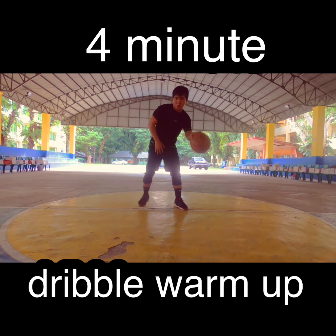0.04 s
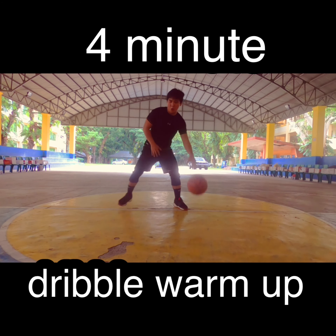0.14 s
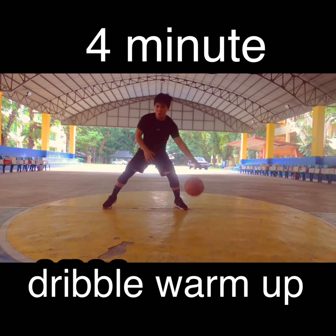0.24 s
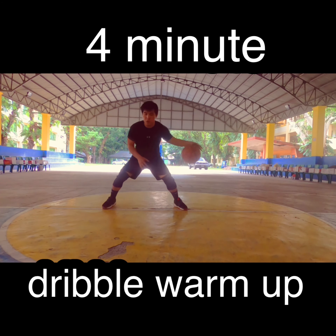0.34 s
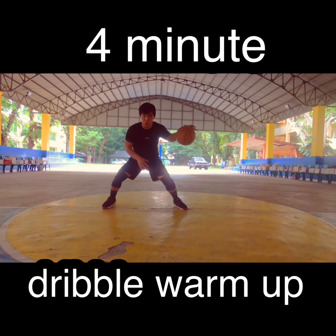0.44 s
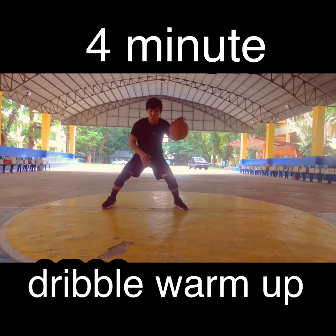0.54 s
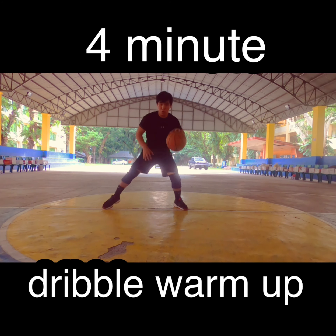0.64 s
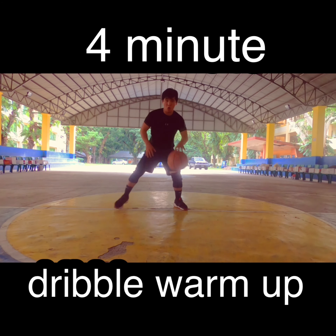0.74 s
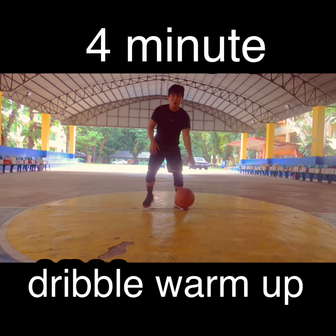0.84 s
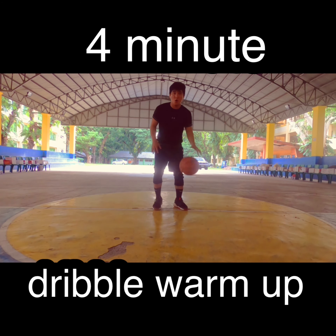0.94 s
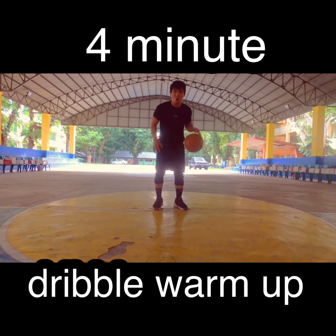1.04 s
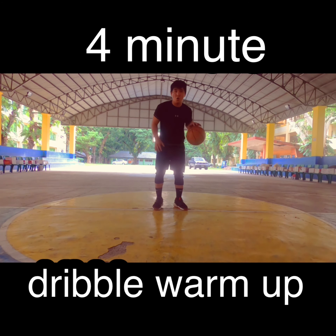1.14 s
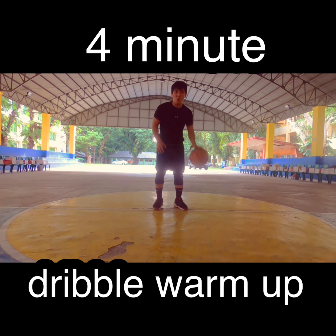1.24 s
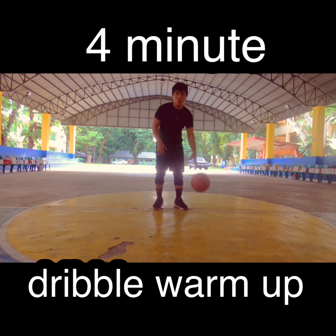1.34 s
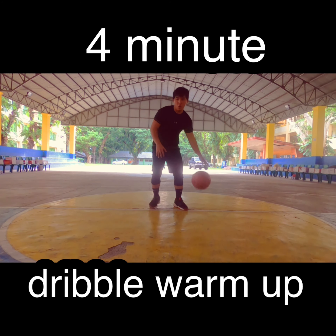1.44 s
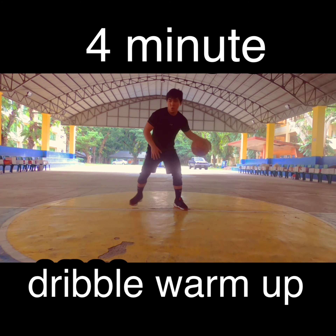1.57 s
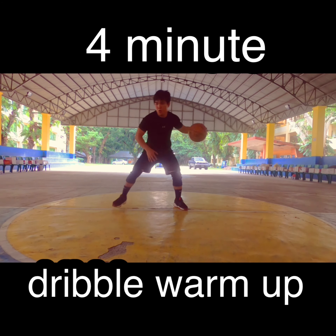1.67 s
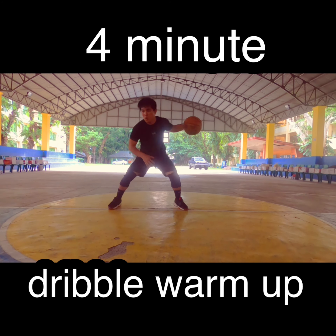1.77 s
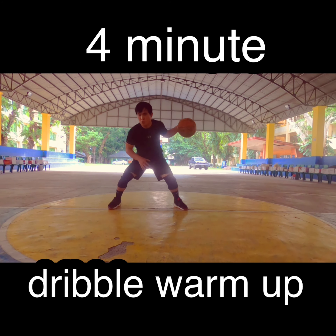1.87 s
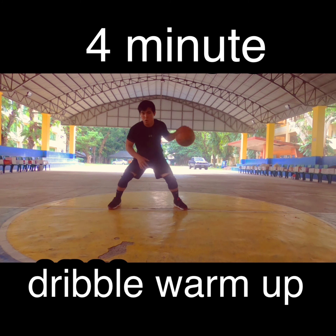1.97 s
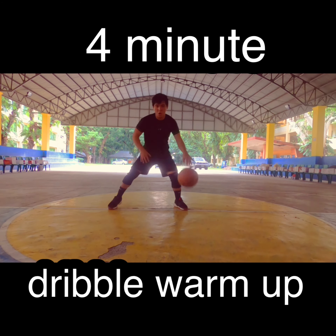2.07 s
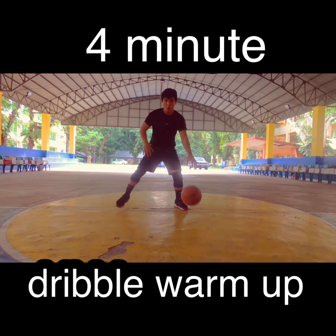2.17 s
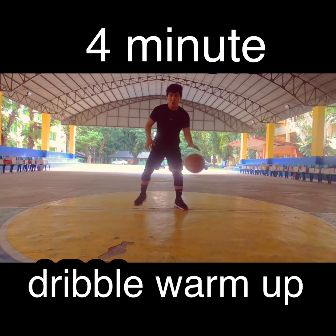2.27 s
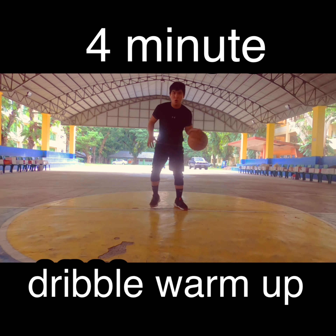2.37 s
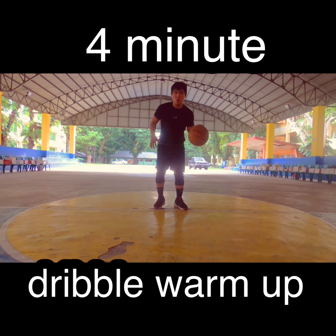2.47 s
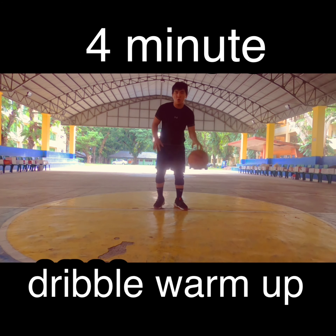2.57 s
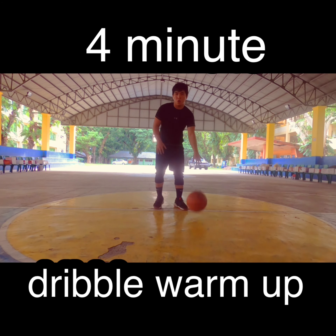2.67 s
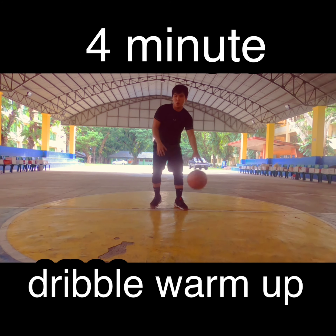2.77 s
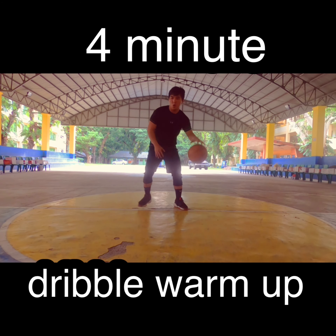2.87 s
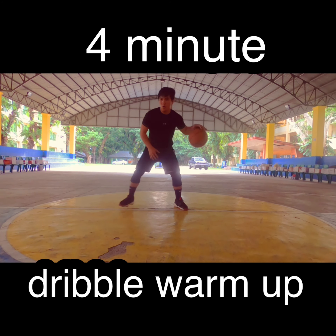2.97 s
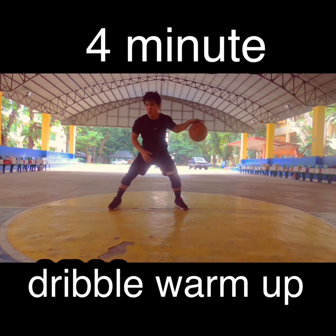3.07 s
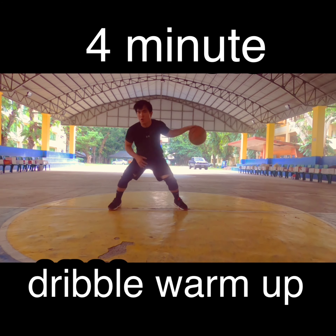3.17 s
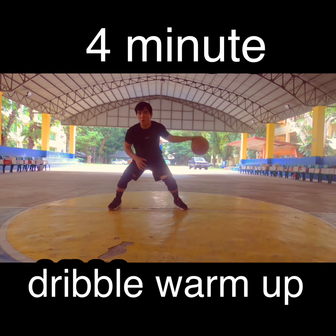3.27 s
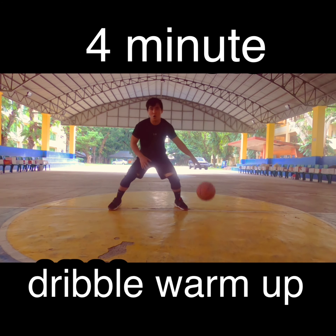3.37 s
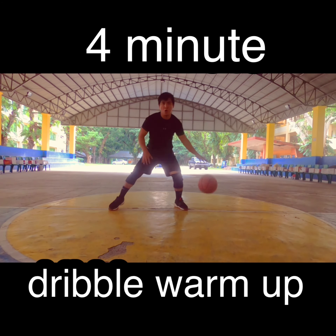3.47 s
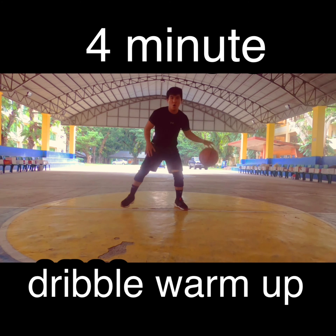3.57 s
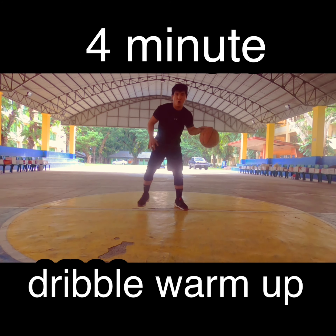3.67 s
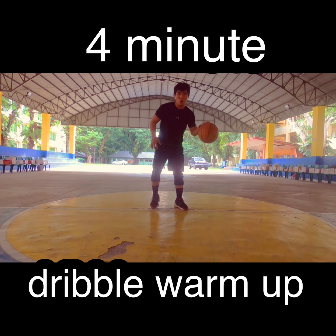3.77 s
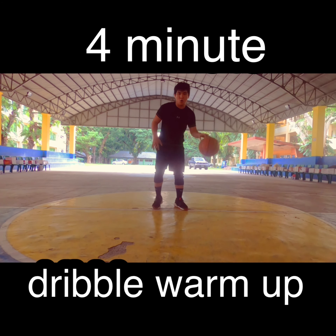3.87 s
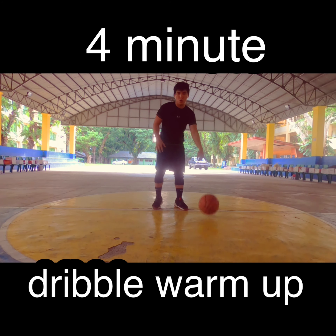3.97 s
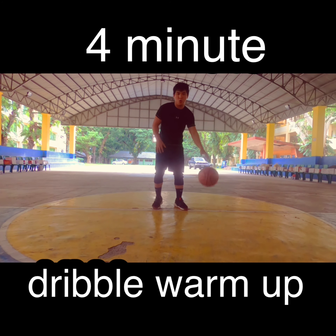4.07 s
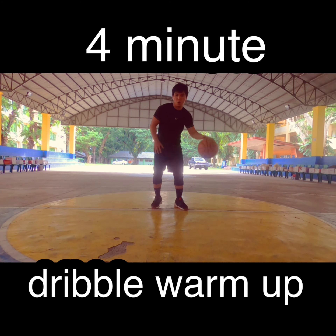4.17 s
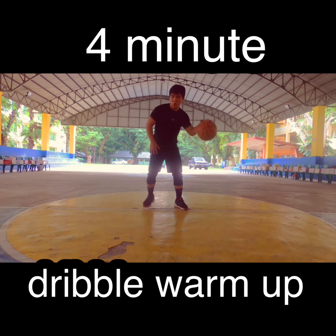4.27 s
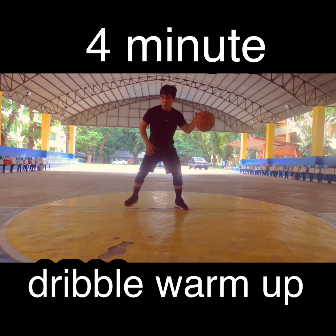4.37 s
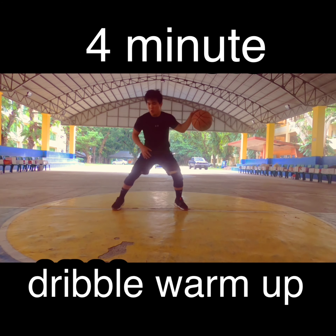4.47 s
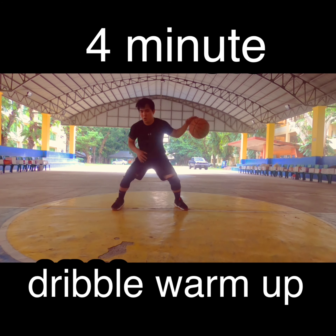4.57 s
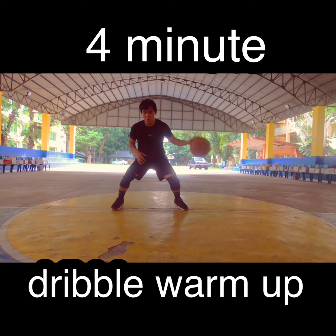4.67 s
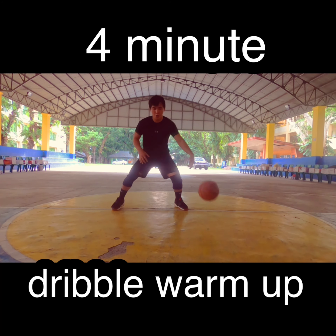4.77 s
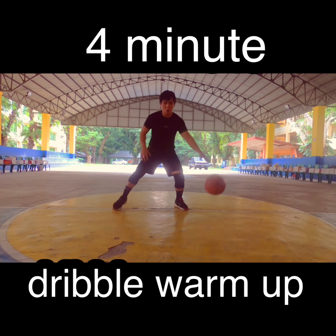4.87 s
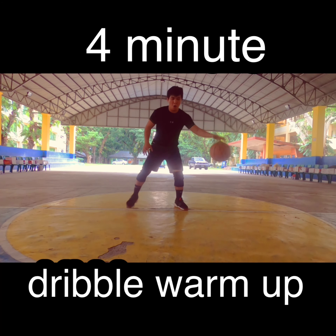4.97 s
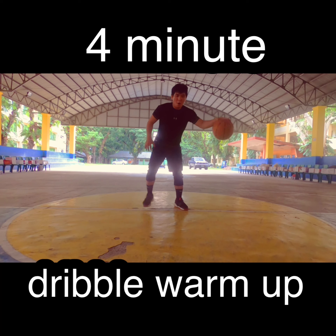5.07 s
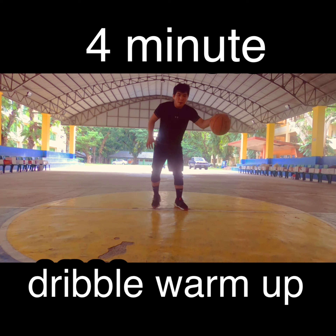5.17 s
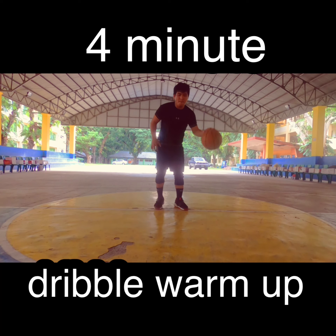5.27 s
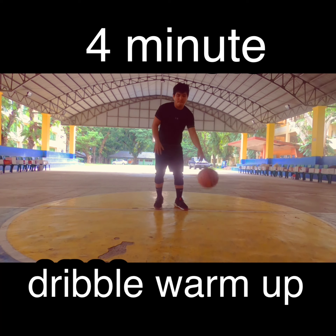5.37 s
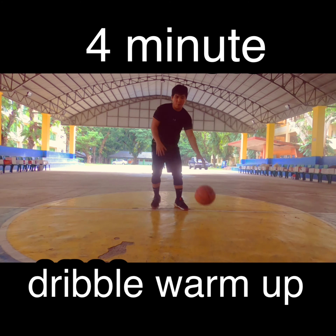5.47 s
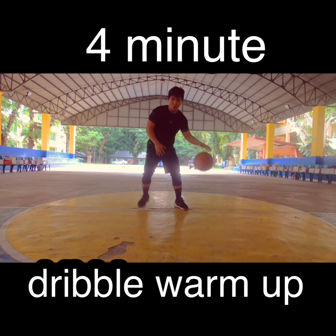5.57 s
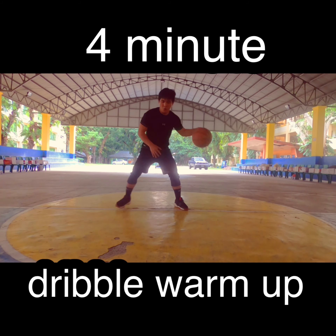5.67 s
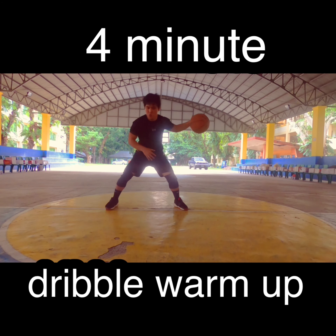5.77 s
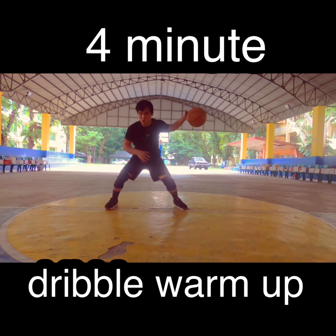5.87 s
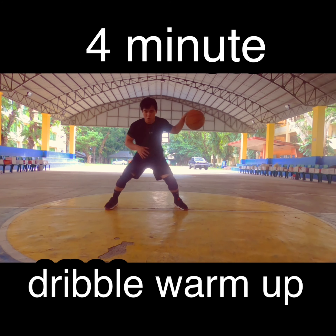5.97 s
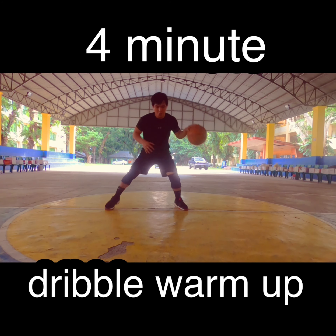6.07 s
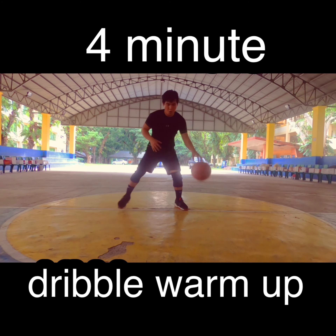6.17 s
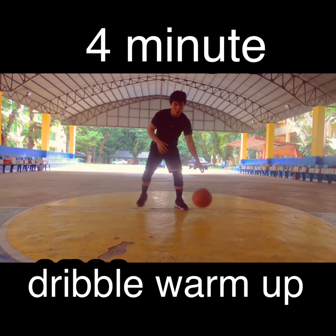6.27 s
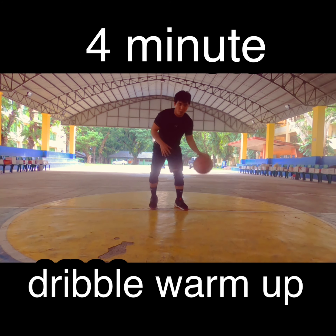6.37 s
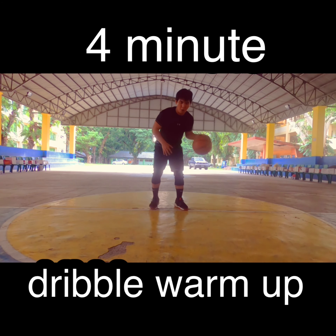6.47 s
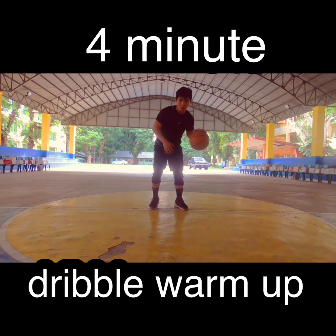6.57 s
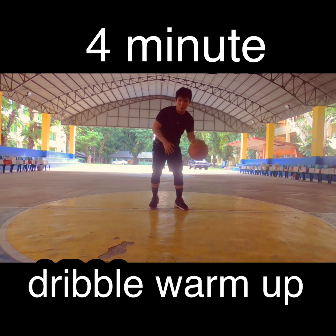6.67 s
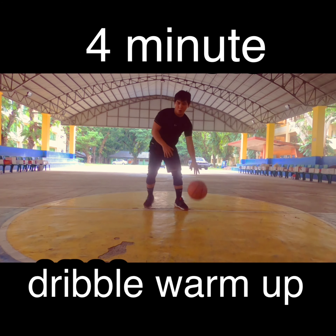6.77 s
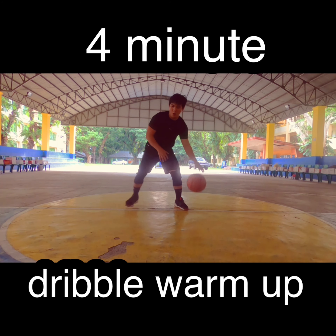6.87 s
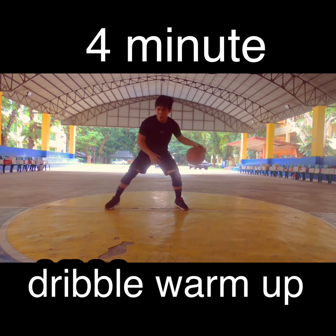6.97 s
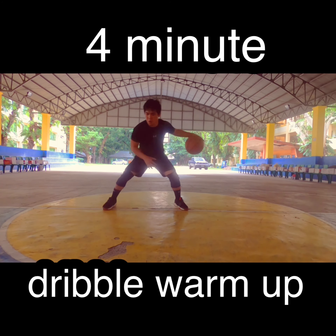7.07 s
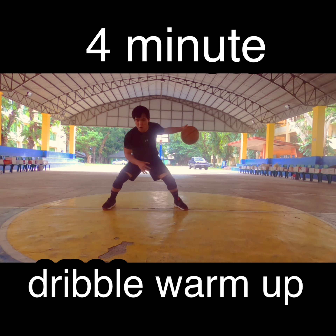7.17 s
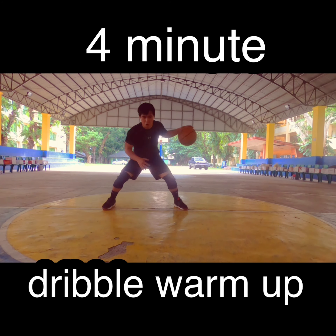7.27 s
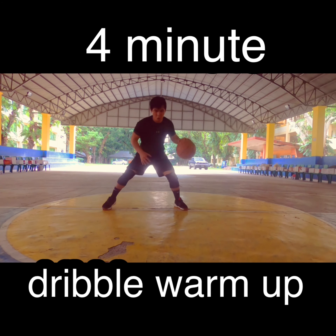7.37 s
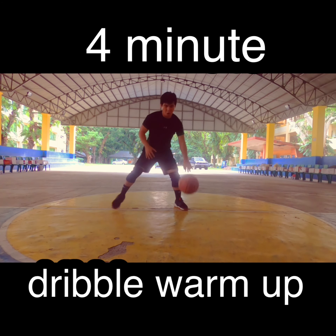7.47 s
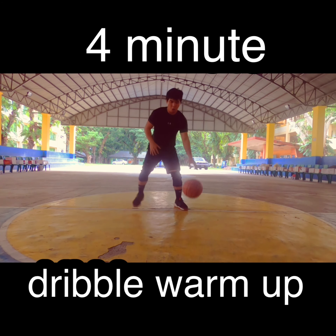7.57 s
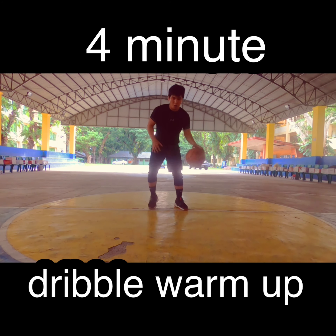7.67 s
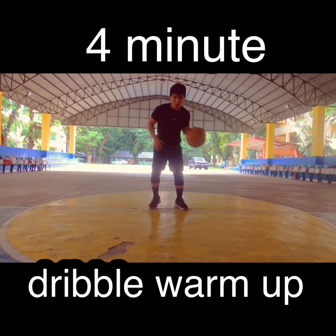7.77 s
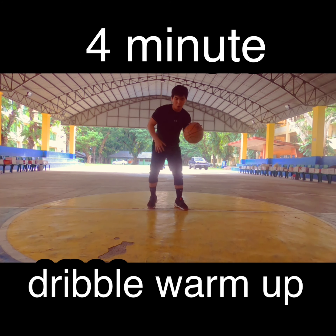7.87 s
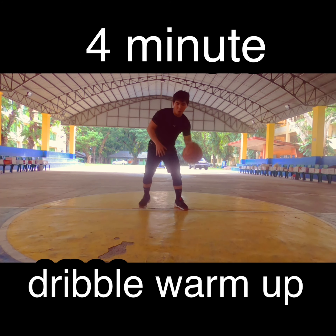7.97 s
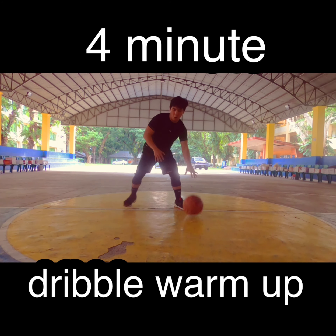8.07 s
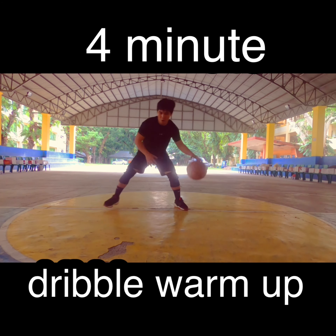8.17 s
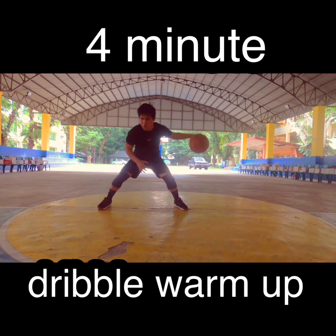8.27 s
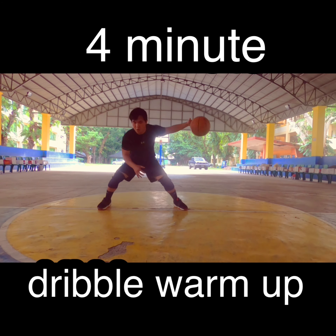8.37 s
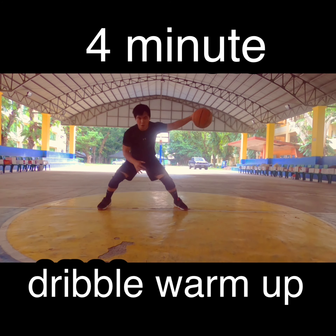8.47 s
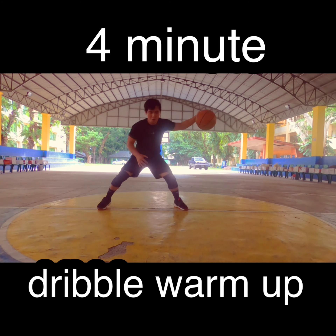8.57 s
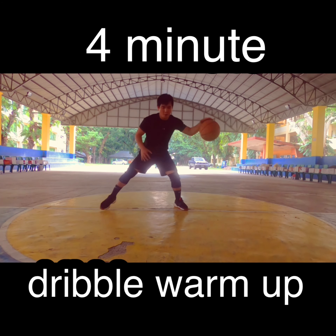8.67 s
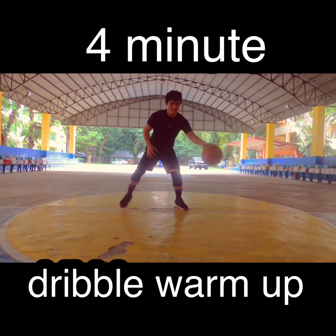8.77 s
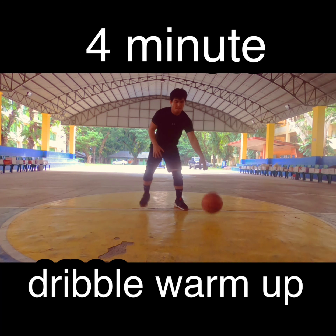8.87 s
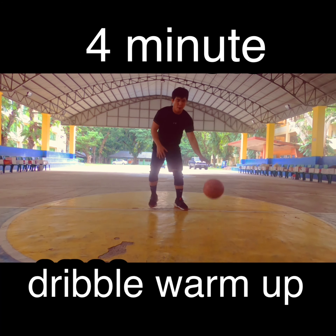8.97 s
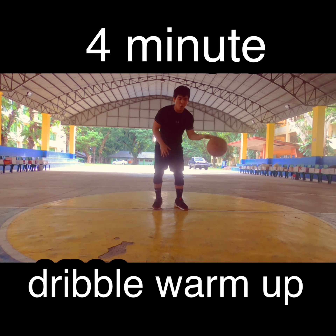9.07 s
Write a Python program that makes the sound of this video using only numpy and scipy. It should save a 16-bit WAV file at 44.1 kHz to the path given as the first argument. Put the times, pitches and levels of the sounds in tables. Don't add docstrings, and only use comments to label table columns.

```python
import sys
import numpy as np
from scipy import signal
from scipy.fft import rfft, irfft
from scipy.io import wavfile
from scipy.ndimage import uniform_filter1d, minimum_filter1d

SR = 44100
rng = np.random.default_rng(int(sys.argv[2]) if len(sys.argv) > 2 else 0)


def unload_audio(sound):
    columns = np.transpose(np.atleast_2d(sound))
    steps = np.round(np.clip(columns, -1, 1) * 32767)
    wavfile.write(sys.argv[1], SR, steps.astype(np.int16))


def magnitude_from_level(level_db):
    exponent = np.asarray(level_db, float) / 20
    return 10 ** exponent


N = 402633

# (time [s], click level [dB], ring level [dB], tail level [dB], roof echo level [dB])
BOUNCE_EVENTS = [(0.3323, -7, -22, -28, -1.5), (0.9613, -6, -22.5, -26, 0.5), (1.5095, -7, -24, -27, -7),
                 (2.2876, -7.5, -23.5, -25.5, -0.5), (2.837, -8, -22, -28, -3), (3.557, -6, -23.5, -25, -2),
                 (4.133, -8.5, -24.5, -24.5, -2.5), (4.9615, -5, -21.5, -25, -1.5),
                 (5.5903, -6, -22.5, -25.5, -4.5), (6.403, -10, -18, -31, -3),
                 (6.9287, -7.5, -23, -25.5, 0.5), (7.6424, -9.5, -19, -24.5, 4.5),
                 (8.1995, -8.5, -19, -29.5, -2.5), (9.008, -6.5, -22, -26.5, -4)]
# (frequency [Hz], level [dB per Hz])
CLICK_SPECTRUM = [(400, -44), (800, 4.5), (1100, 1), (2100, -2), (3100, -3), (4300, -7), (5200, -12.5),
                  (6300, -17.5), (7500, -26), (9300, -19.5), (11000, -31.5), (12500, -38), (15000, -45),
                  (16500, -70)]
ROUND_TRIP_S = .0479


def evened(x):
    return x / np.sqrt(np.mean(x ** 2) + 1e-20)


def read(points, hz):
    f, value = np.transpose(points)
    return np.interp(np.log(hz + 1), np.log(f + 1), value)


def add(mix, s, sound):
    at = round(s * SR)
    part = mix[max(at, 0):][:max(len(sound) + min(at, 0), 0)]
    part += sound[max(-at, 0):][:len(part)]


def noise(seconds, db_of, patchy_db):
    hz = np.fft.rfftfreq(1024, 1 / SR)[:, None]
    t = np.arange(int(seconds * SR) // 256 + 2) * 256 / SR
    a, b, patches = rng.standard_normal((len(t), 513, 3)).T
    patches = uniform_filter1d(uniform_filter1d(patches, size=8, axis=0), size=5, axis=1)
    patches_db = patchy_db * evened(patches) * np.minimum(hz / 700, 1)
    bins = (a + 1j * b) * magnitude_from_level(db_of(hz, t) + patches_db)
    return signal.istft(bins, nperseg=1024, noverlap=768)[1]


def narrow(hz, width_hz):
    a, b = rng.standard_normal((len(hz), 2)).T
    r = np.exp(-np.pi * width_hz / SR)
    slow = signal.lfilter([1], np.convolve([1, -r], [1, -r]), a + 1j * b)
    carrier = np.exp(2j * np.pi * np.cumsum(hz) / SR)
    return evened((slow * carrier).real)


def thump():
    # (first delay [s], spacing [s], gain [ratio], factor to the next [ratio])
    bass_echoes = [(.0251, 0.0048, .21, .45), (.045, .0077, -.28, .3), (.0578, .0096, .33, .78),
                   (.0929, .0115, -.44, .78), (.1639, .0166, .16, 0.62), (.1805, .0077, .14, .6),
                   (.222, 0.01272, -0.1, -1.07), (.265, 0.01155, -0.085, -0.67)]
    contact_s, skin_hz, skin_width_hz = .0106, 203, 160
    t = np.arange(1500) / SR
    squash = np.sin(np.pi * np.clip((t - .001) / contact_s, 0, 1)) ** 1.803
    r = np.exp(-np.pi * skin_width_hz / SR)
    skin = [1, -2 * r * np.cos(2 * np.pi * skin_hz / SR), r * r]
    push = signal.lfilter([-1, 2, -1], skin, squash)
    echoes = np.zeros(SR // 3)
    echoes[0] = 1
    k = np.arange(4)
    for s, step_s, gain, factor in bass_echoes:
        echoes[np.round((s + step_s * k) * SR).astype(int)] += gain * factor ** k
    return np.convolve(push / abs(push).max(), echoes)


def slap(tilt_db):
    # (delay [ms], level [dB])
    rattle = [
        (-.96, -9),
        (0, 0),
        (.96, -7),
        (1.95, -12),
        (2.9, -19),
    ]
    hz = np.fft.rfftfreq(1024, 1 / SR)
    train = np.zeros(len(hz), complex)
    for ms, db in rattle:
        level = magnitude_from_level(db + 2.5 * rng.standard_normal())
        delay_s = (ms * rng.uniform(0.93, 1.05) + 2) / 1000
        train += level * np.exp(-2j * np.pi * hz * delay_s)
    grit = .035 * rng.standard_normal(1024) * np.exp(-abs(np.arange(1024) - 100) / 70.)
    train += rfft(grit)
    train *= hz ** 8 / (hz ** 8 + 830. ** 8)
    colour = magnitude_from_level(read(CLICK_SPECTRUM, hz) + tilt_db * np.log2(hz / 2000 + 0.081))
    click = irfft(-1j * colour * train)
    return click / abs(click).max()


def ring(pitch=1):
    # (frequency [Hz], level [dB], t60 [s])
    ball_modes = [(405, -8, .09), (960, -3, .024), (1080, 0, .024), (1200, -4, .024), (2090, -10, .022),
                  (3100, -14, .02)]
    t, out = np.arange(4000) / SR, np.zeros(5000)
    for s, db, rise_s in ((0, 0, .0008), (.0095, -1.0, .002)):
        modes = np.zeros(len(t))
        for hz, mode_db, t60_s in ball_modes:
            mode_hz = hz * rng.uniform(.97, 1.03) * pitch
            level_db = mode_db + 1.3 * rng.standard_normal() - 60 * t / t60_s
            modes += magnitude_from_level(level_db) * np.sin(2 * np.pi * mode_hz * t)
        add(out, s, magnitude_from_level(db) * modes * np.minimum(t / rise_s, 1))
    return out


def bright_bounce(click_db, ring_db, over_usual_db):
    bright = magnitude_from_level(click_db - 1.5) * np.pad(slap(0.7 * (click_db + 10)), (0, 4000))
    pitch = 1 + 0.05 * (over_usual_db + 0.5)
    add(bright, .002, magnitude_from_level(ring_db + 3.0) * ring(pitch))
    return bright


def smear():
    t = np.arange(2000) / SR
    hz, turn, size = rng.random((24, 3)).T[:, :, None]
    hz = 900 + 11000 * hz
    level = magnitude_from_level(0.55 * read(CLICK_SPECTRUM, hz) + 15 * size)
    tones = (level * np.sin(2 * np.pi * (hz * t + turn))).sum(0)
    return evened(tones) * np.interp(t, [0, .024, .04], [0, 1, 0]) ** 1.92


def add_roof_echoes(out, s, bright, roof_db):
    first_s, first_db, loss_db_per_trip = .0412, -6.5, 3.6
    for trip in range(5):
        delay_s = first_s + trip * ROUND_TRIP_S
        db = first_db + roof_db - trip * loss_db_per_trip
        blur = rng.standard_normal(200) * np.exp(-np.arange(200) / 35.)
        blur[0] = 12.0
        blurred = np.convolve(bright, blur / np.linalg.norm(blur))
        echo = signal.lfilter([.27], [1, -.73], blurred)
        add(out, s + delay_s - .002, magnitude_from_level(db) * echo)


def ribs():
    rib_hz, nearest_s = 2450, 0.041
    flight_s = nearest_s + np.arange(150, 1500) / SR
    hz = rib_hz * flight_s / np.sqrt(flight_s ** 2 - nearest_s ** 2)
    return narrow(hz * rng.uniform(0.89, 1.04), 310) * signal.windows.tukey(len(hz), .7)


def hall(colour_db, start_s, rise_s, early):
    # (frequency [Hz], t60 [s])
    decay_t60 = [(60, 2.5), (150, 1.04), (400, 1.72), (1000, 1.96), (3000, 1.9), (6000, 1.3), (10000, 1.07),
                 (15000, 0.63)]
    tail = noise(1.6, lambda hz, t: colour_db(hz) - 60 * (t - .2) / read(decay_t60, hz), patchy_db=2.5)
    t = np.arange(len(tail)) / SR
    throb = 1 + 0.5 * np.exp(-t / 0.14) * np.cos(2 * np.pi * (t - .05) / ROUND_TRIP_S)
    rise = np.clip((t - start_s) / rise_s, early, 1)
    return tail * throb * rise * np.clip((1.6 - t) / .4, 0, 1)


def treble_hall(ring_db, over_usual_db):
    # (frequency [Hz], level [dB per Hz])
    air_spectrum = [(500, -3), (700, -13), (950, -0.5), (1300, -7), (1650, -10.5), (2900, -12),
                    (4200, -13.5), (5000, -20), (6500, -24), (7600, -29.5), (9300, -27), (11000, -38.5),
                    (14500, -51), (15500, -77)]
    bright_db_per_octave = 0.41 * over_usual_db

    def colour_db(hz):
        lift_db = 1.71 * (ring_db + 24.0) * np.exp(-np.log(hz / 1150 + 1e-9) ** 2 / 0.23)
        tilt_db = bright_db_per_octave * np.log2(hz / 3000 + .01)
        return read(air_spectrum, hz) - 40 * (hz < 480) + lift_db + tilt_db
    return hall(colour_db, 0.032, 0.0072, 0.64)


def dribble():
    earlier = (-0.24, -9, -24, -27, -3)
    # (frequency [Hz], level [dB per Hz])
    hall_spectrum = [(18, -44), (30, -5), (75, -9.5), (114, 3.5), (189, -15.5), (239, 1), (286, -19),
                     (397, -5), (462, -30), (567, -19), (651, -35), (800, -22.5), (1040, -72), (1760, -120)]
    thump_db, usual_ring_db = -9.5, -22.5

    def boom_db(hz):
        return read(hall_spectrum, hz) - 10 * np.log10(1 + (hz / 200) ** 6)

    def body_db(hz):
        return read(hall_spectrum, hz) - 10 * np.log10(1 + (200 / (hz + 1)) ** 6)

    out, bass = np.zeros(N), thump()
    boom = hall(boom_db, 0.038, 0.25, 0.44)
    body, other = (hall(body_db, 0.0229, 0.0034, 0.9) for _ in range(2))
    for s, click_db, ring_db, tail_db, roof_db in [earlier] + list(BOUNCE_EVENTS):
        over_usual_db = ring_db - usual_ring_db
        s += .0011
        bright = bright_bounce(click_db, ring_db, over_usual_db)
        add(out, s - .002, bright)
        add_roof_echoes(out, s, bright, roof_db)
        add(out, s + 0.046, magnitude_from_level(click_db - 39) * ribs())
        add(out, s, magnitude_from_level(thump_db) * bass)
        spot = rng.uniform(-1.2, 1.2)
        low_tail = np.cos(spot) * body + np.sin(spot) * other
        add(out, s, magnitude_from_level(thump_db - 24.0) * boom + magnitude_from_level(thump_db - 25.5) * low_tail)
        add(out, s, magnitude_from_level(tail_db - 28.0) * treble_hall(ring_db, over_usual_db))
        add(out, s - .024, magnitude_from_level(click_db - 26.5) * smear())
    return out


def hands():
    # (time [s], hiss level [dB], pat level [dB])
    catches = [(0.625, -51, -57.5), (0.725, -49, -48), (1.848, -63, -35), (1.9394, -62, -55),
               (2.138, -54, -58), (3.1906, -44, -55), (4.596, -40, -32.5), (4.6151, -47, -35.5),
               (5.89, -43, -59), (6.237, -43, -69.5), (7.4659, -52, -64), (8.7294, -60, -67)]
    out, t = np.zeros(N), np.arange(3000) / SR
    high = signal.butter(2, [5500, 11500], "band", fs=SR)
    for s, hiss_db, pat_db in catches:
        brush = signal.lfilter(*high, rng.standard_normal(3000)) * np.exp(-t / .015)
        add(out, s, magnitude_from_level(hiss_db - 8.5) * brush * np.minimum(t / .007, 1))
        pat = narrow(np.full(3000, 2300.), 1300) * np.exp(-t / 0.0089)
        add(out, s, magnitude_from_level(pat_db) * 0.41 * pat)
        add(out, s, magnitude_from_level(pat_db - 9.0) * ring())
    return out


def feet():
    # (time [s], level [dB])
    steps = [
        (4.599, -27.5),
        (4.701, -28.5),
        (5.421, -30),
        (8.47, -53),
    ]
    out = np.zeros(N)
    for s, db in steps:
        add(out, s, magnitude_from_level(db) * thump())
    return out


def squeaks():
    # (time [s], length [s], frequency [Hz], level [dB])
    short_squeaks = [(0.248, 0.057, 5020, -53), (1.079, 0.38, 5340, -56), (1.283, 0.17, 3040, -53.5),
                     (1.333, 0.14, 4170, -52), (1.842, 0.25, 2810, -56.5), (1.899, 0.37, 3610, -55),
                     (2.027, 0.26, 5120, -55), (2.042, 0.17, 8500, -69), (2.682, 0.11, 5680, -56),
                     (3.058, .07, 5260, -57), (3.104, 0.099, 3960, -51), (3.179, 0.14, 3460, -58),
                     (4.053, 0.046, 5380, -50), (4.651, 0.128, 3190, -51), (4.721, 0.093, 4200, -51),
                     (4.885, 0.057, 5280, -55), (5.888, 0.016, 6000, -51), (6.849, 0.065, 3920, -50.5),
                     (7.913, 0.22, 4200, -63), (8.763, 0.204, 3910, -58.5), (8.765, 0.18, 4190, -60)]
    # (multiple of the pitch, level [dB])
    overtones = [(2, -51), (3, -66), (4, -76)]
    squeal_s, squeal_length_s, squeal_hz = 2.65, 0.184, 2660
    events = [(*row, .065) for row in short_squeaks]
    events += [(squeal_s, squeal_length_s, k * squeal_hz, db, .015) for k, db in overtones]
    out = np.zeros(N)
    for s, length_s, hz, db, spread in events:
        n = int(length_s * SR)
        flicker = evened(uniform_filter1d(rng.standard_normal(n), size=600))
        band = narrow(np.full(n, hz), spread * hz)
        add(out, s, magnitude_from_level(db - 5.0 + 3.0 * flicker) * band * signal.windows.tukey(n, .4))
    return out


def sparrows():
    # (time [s], frequency [Hz], level [dB])
    chirp = [(0, 6370, -16), (.03, 5730, -2.5), (.05, 5370, -6), (.065, 5950, -11), (.095, 5320, -15)]
    # (time [s], pitch factor [ratio], level [dB])
    calls = [(.885, 0.93, -52.5), (1.86, 0.97, -55), (3.8, 0.97, -55.5), (5.5, 1, -56), (6.1, 1, -57),
             (6.8, 0.91, -57), (7.38, 1.02, -58), (7.489, .9, -62), (8.71, 0.89, -59)]
    out = np.zeros(N)
    when_s, hz, shape_db = np.transpose(chirp)
    t = np.arange(0, when_s[-1], 1 / SR)
    for s, pitch, db in calls:
        call = narrow(pitch * np.interp(t, when_s, hz), 200) * magnitude_from_level(db + np.interp(t, when_s, shape_db))
        add(out, s, call * signal.windows.tukey(len(t), .2))
    return out


def distant(x):
    t = np.arange(SR // 2) / SR
    far = rng.standard_normal(len(t)) * magnitude_from_level(-60 * t)
    return x + signal.oaconvolve(x, far / np.linalg.norm(far))[:N]


def outdoor_hum():
    # (frequency [Hz], level [dB per Hz])
    hum_spectrum = [(12, -30), (20, -6), (101, 4.5), (181, -16.5), (233, -1), (407, -9.5), (673, -31),
                    (1050, -18), (1690, -30.5), (4240, -30.5), (9270, -49.5), (13300, -64), (15800, -102)]
    swell = evened(uniform_filter1d(rng.standard_normal(N // 256 + 2), size=40))

    def level_db(hz, t):
        return read(hum_spectrum, hz) + 1.24 * swell[:len(t)] * (hz < 500)
    return magnitude_from_level(-40.5) * evened(noise(N / SR, level_db, patchy_db=2.6)[:N])


def scene():
    mono = dribble() + hands() + feet() + distant(squeaks() + sparrows()) + outdoor_hum()
    return np.tile(mono, (2, 1))


def top_fill(x):
    hz, _, z = signal.stft(x, SR, nperseg=512)
    power = uniform_filter1d(abs(z) ** 2, size=9, axis=0)
    level = np.sqrt(uniform_filter1d(minimum_filter1d(power, size=5, axis=1), size=5, axis=1))
    a, b = rng.standard_normal(level.T.shape + (2,)).T
    return signal.istft(level * (a + 1j * b) * (hz > 11600)[:, None], SR, nperseg=512)[1][:N]


def attack_split(x):
    gate = np.zeros(N)
    for s, *_ in BOUNCE_EVENTS:
        flutter = evened(uniform_filter1d(rng.standard_normal(400), size=20))
        add(gate, s - .003, np.hanning(400) * flutter)
    return gate * signal.lfilter(*signal.butter(4, 2500, "high", fs=SR), x)


def low_pass(x):
    return signal.sosfilt(signal.butter(12, 15900, fs=SR, output="sos"), x)


def record(dry):
    cut = signal.lfilter(*signal.butter(2, 40, "high", fs=SR), dry[0])
    split = magnitude_from_level(-23.5) * attack_split(cut) + magnitude_from_level(-0.5) * top_fill(cut)
    return low_pass(np.array([cut + split, cut - split]))


dry = scene()
out = record(dry)
unload_audio(out)
```